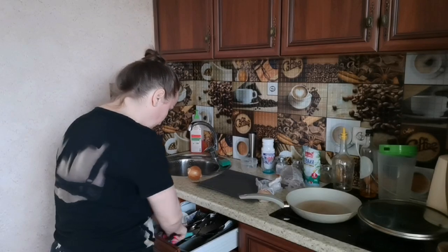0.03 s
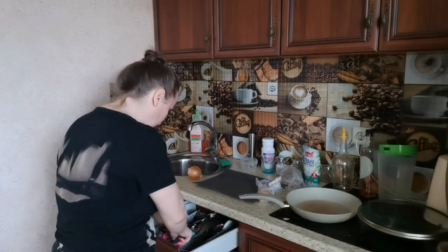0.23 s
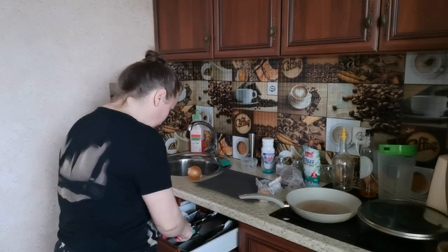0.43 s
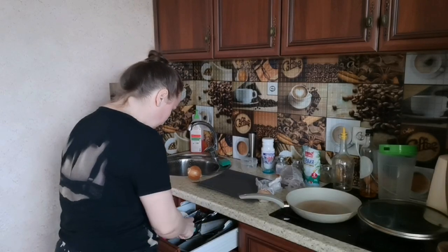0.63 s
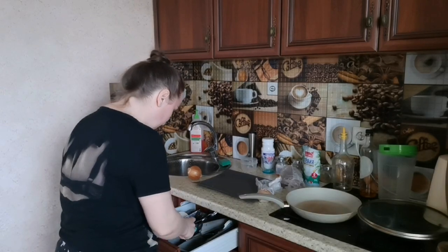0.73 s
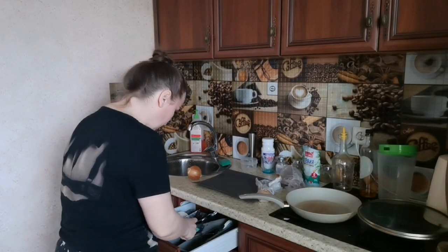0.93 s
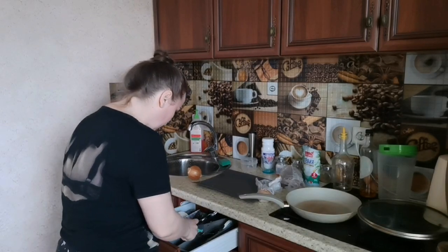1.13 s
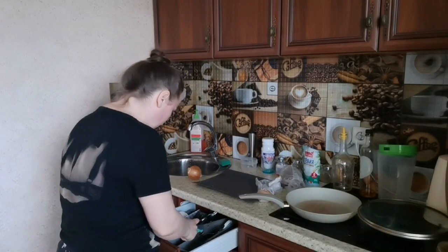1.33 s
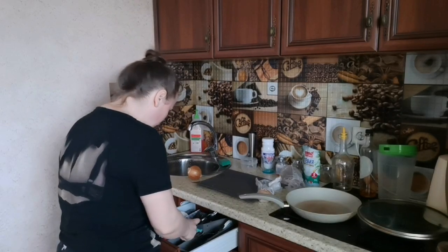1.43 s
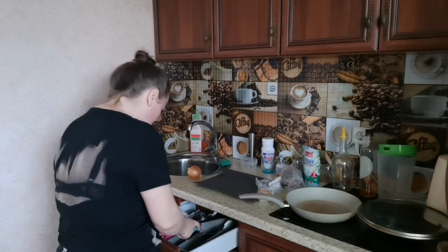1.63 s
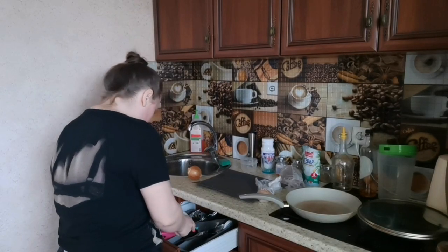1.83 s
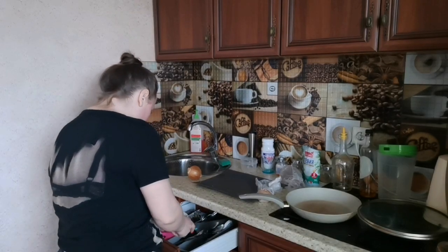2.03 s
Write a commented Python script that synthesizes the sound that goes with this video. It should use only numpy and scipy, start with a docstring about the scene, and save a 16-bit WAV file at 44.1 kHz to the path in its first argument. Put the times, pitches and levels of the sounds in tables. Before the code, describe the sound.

Cutlery and utensils clatter in a drawer as a hand rummages in bursts, with knocks, scraping slides, metal clinks and plastic clacks, heard from a short distance in a small, reflective kitchen over a faint hum.

```python
"""In a small, hard-walled kitchen, a hand rummages through an open drawer in three bouts.
Knocks and slides are bursts of contacts, coloured as utensils, that also set the tray ringing.
Free metal pieces clink and plastic ones clack as sums of dying tones; a dragged handle gives a rising,
hollow note. Short bands of noise make the drawer rumble, over shaped air noise and an appliance's hum."""
import sys
import numpy as np
from scipy import signal
from scipy.fft import rfft, irfft
from scipy.io import wavfile

SR = 44100
rng = np.random.default_rng(int(sys.argv[2]) if len(sys.argv) > 2 else 0)


def file_out(sig):
    """Save sig as 16-bit WAV at sys.argv[1]."""
    # one column per channel
    cols = np.atleast_2d(sig).T
    # limit, then scale
    lim = np.clip(cols, -1, 1)
    pcm = np.round(lim * 32767).astype(np.int16)
    wavfile.write(sys.argv[1], SR, pcm)


N = 92610  # length of the scene [samples]

# modes of the metal pieces that ring free: (frequency [Hz], level [dB], t60 [s])
LADLE = [(777, -16, 0.49), (1240, -5.5, 0.086), (2825, -8.5, 0.39), (2905, -11, 0.2), (6830, -22.5, 0.11)]
TEASPOON = [(7290, 1, 0.14)]
TONGS = [(2250, 2.5, 0.14), (4300, 5, 0.2), (4770, -13, 0.09)]
GRATER = [(2360, 2.5, 0.096), (3870, 2, 0.19), (3980, 1.5, 0.12)]
FORK = [(9895, 0, .66)]
WHISK = [(9600, 0.0058, 0.36)]
PEELER = [(11670, 5, 0.21), (11790, 0, 0.17)]
KNIFE = [(3160, 1.5, 0.23), (3230, -15, 0.11), (3820, -21, 0.18), (10000, -26, 0.22), (11200, -14, 0.34)]
SPOON = [(1150, -13, 0.3), (2190, -2.5, 0.13), (3710, 4.5, 0.085), (4150, -3, .08), (5370, -9, 0.15),
         (7420, -9, 0.18)]
# modes of the hollow plastic pieces: (frequency [Hz], level [dB], t60 [s])
TUB = [(1248, 1.5, 0.038), (1478, 0.5, 0.023), (1602, -1.5, 0.061), (1820, -10, 0.043)]
SPATULA = [(540.4, -2, 0.13), (885, -4, 0.053), (1183, 0, 0.071)]
SCOOP = [(1205, 4, 0.035), (1416, -6.5, 0.035), (1592, -15.5, 0.1)]
LID = [(611.7, -1, 0.3), (690, -0.5, 0.21), (1185, -1.5, 0.091), (1440, 1.5, 0.055)]


def amp(db):
    """Decibels to gain."""
    return 10 ** (np.asarray(db) / 20)


def unit(x):
    """Scales to energy 1."""
    return x / np.sqrt(np.sum(x ** 2, -1, keepdims=True) + 1e-20)


def read(points, hz):
    """Reads a table of (frequency, value) on a log-frequency axis."""
    f, value = np.transpose(points)
    return np.interp(np.log(hz + 1), np.log(f + 1), value)


def add(mix, s, sound):
    """Mixes a sound in at a time in seconds, cut off at the end of the mix."""
    part = mix[:, round(s * SR):][:, :sound.shape[-1]]
    part += sound[..., :part.shape[-1]]


def seconds(length):
    """A time axis."""
    return np.arange(round(length * SR)) / SR


def wander(t, length, count):
    """A random curve through evenly spaced knots."""
    return np.interp(t, np.linspace(0, length, count), rng.standard_normal(count))


def causal(gain_db, size=2048):
    """The sharpest (minimum-phase) impulse response with this spectrum, by folding its cepstrum."""
    cepstrum = irfft(np.log(amp(gain_db)))
    cepstrum[1:size] *= 2
    cepstrum[size + 1:] = 0
    return irfft(np.exp(rfft(cepstrum)))[:size]


def ringing(modes, size=32768):
    """Dying tones that build up over the time of contact; each level is the energy of its mode."""
    contact_s = 0.0006
    t = np.arange(size) / SR
    rise = 1 - np.exp(-(t / contact_s) ** 2)
    sound = 0
    for hz, db, t60 in modes:
        decay = np.exp(-np.log(1000) * t / t60)
        sound = sound + amp(db) * unit(rise * np.cos(2 * np.pi * hz * t) * decay)
    return sound


def paired(z, hz):
    """Blends two unrelated spectra until they are as alike as the two microphones hear the room."""
    # left-right likeness: (frequency [Hz], correlation [0-1])
    likeness = [(60, 0.3), (150, 1), (280, 0.63), (500, 0.74), (900, 0.051), (2200, 0.063), (12000, 0.099)]
    angle = np.arcsin(np.clip(read(likeness, hz), -1, 1)) / 2
    return np.cos(angle) * z + np.sin(angle) * z[::-1]


def kitchen(direct, size=30000, count=8):
    """The path from one spot in the drawer: direct sound, a flurry of near reflections, a dense tail."""
    # reverberation: (frequency [Hz], t60 [s])
    reverb = [(150, 0.52), (400, 0.45), (1000, 0.5), (2800, 0.41), (4600, 0.38), (7300, .34), (13000, 0.22)]
    early_gain, early_s = 0.063, 0.014  # single reflections, within this time
    flurry_gain, flurry_s = 0.091, 0.0022  # extra gain at the start of the tail, and its fade
    hz, t, z = signal.stft(rng.standard_normal((2, size)), SR, nperseg=256)
    decay = np.exp(-np.log(1000) * t[:, None] / read(reverb, hz))
    z = paired(z.swapaxes(1, 2), hz) * decay
    tail = signal.istft(z.swapaxes(1, 2), SR, nperseg=256)[1]
    flurry = flurry_gain * np.exp(-np.arange(tail.shape[1]) / SR / flurry_s)
    path = unit(tail * (1 + flurry))
    path[:, 0] += direct
    for side in path:
        arrivals = (rng.random(count) * early_s * SR).astype(int)
        side[arrivals] += early_gain * rng.choice([-1, 1], count)
    return path


def in_kitchen(sound, direct):
    """Sends a mono sound through a fresh path to the two microphones."""
    return signal.fftconvolve(sound[None], kitchen(direct), axes=1)


def background():
    """Shaped noise for the quiet room, and steady tones wavering in level and phase for an appliance."""
    # colour of the air noise: (frequency [Hz], relative density [dB per Hz])
    air_colour = [(24, -33), (40, -10.5), (239, -10), (313, -15.5), (382, -17), (454, -13), (527, -15.5),
                  (612, -11.5), (824, -18), (4680, -31), (5160, -33), (5560, -37), (15000, -44)]
    # appliance tones: (frequency [Hz], level before wavering [dB])
    hum = [(60, -66.5), (99, -69), (293, -70), (587, -76.5), (636, -69), (5001, -81.5)]
    air_db, hum_waver = -58.5, 0.55
    hz, t = np.fft.rfftfreq(N, 1 / SR), np.arange(N) / SR
    noise = paired(rfft(rng.standard_normal((2, N))), hz)
    air = irfft(noise * amp(read(air_colour, hz)), N)
    out = amp(air_db) * np.sqrt(N) * unit(air)
    for tone_hz, db in hum:
        swell = hum_waver * wander(t, t[-1], 20)
        drift = hum_waver * wander(t, t[-1], 20)
        tone = np.sin(2 * np.pi * tone_hz * t + 2 * drift)
        out = out + amp(db) * np.sqrt(2) * (1 + swell) * tone
    return out


def drawer():
    """Short low rumbles, each a narrow band of noise, as the drawer shifts and its panels boom."""
    # rumbles: (time [s], length [s], centre frequency [Hz], level [dB])
    rumbles = [(0.172, 0.09, 112, -55.5), (0.252, 0.17, 301, -44), (.28, 0.16, 214, -47.5),
               (0.405, 0.092, 221.5, -53), (0.414, 0.1, 108, -56.5), (1.195, 0.081, 370, -42.5),
               (1.369, 0.11, 114, -55), (1.636, 0.22, 112, -60)]
    width_hz = 10  # from the centre to a gain of 1/e
    out, hz = np.zeros((2, N)), np.fft.rfftfreq(SR, 1 / SR)
    for s, length, centre_hz, db in rumbles:
        t = seconds(length)
        band = np.exp(-((hz - centre_hz) / width_hz) ** 2)
        noise = irfft(rfft(rng.standard_normal(SR)) * band)
        swell = np.sin(np.pi * t / length)
        add(out, s, amp(db) * np.sqrt(len(t)) * unit(noise[:len(t)] * swell))
    return out


def drag():
    """A plastic handle sticks and slips along the tray; its hollow note rises as it goes."""
    # the drag: (length [s], from frequency [Hz], to frequency [Hz], level [dB])
    course = (0.1571, 501.5, 673.5, -35.5)
    start_s, direct = 0.172, 1  # begins after the first knock
    slips_per_s, slip_jitter, slip_depth = 91, 0.22, 0.49  # jitter in slips, depth 0-1
    roughness = 0.64  # phase wander [rad]
    length, from_hz, to_hz, db = course
    t = seconds(length)
    slips = slips_per_s * t + slip_jitter * wander(t, length, 9)
    grip = 1 - slip_depth * np.cos(np.pi * slips) ** 2
    rough_phase = roughness * wander(t, length, 16)
    glide_hz = np.linspace(from_hz, to_hz, len(t))
    note = np.sin(2 * np.pi * np.cumsum(glide_hz) / SR + rough_phase)
    sound = note * grip * np.sqrt(np.sin(np.pi * t / length))
    out = np.zeros((2, N))
    add(out, start_s, amp(db) * np.sqrt(len(t)) * unit(in_kitchen(sound, direct)))
    return out


def struck(events, direct):
    """Pieces that lie free speak at once when struck, and ring on, mode by mode."""
    out = np.zeros((2, N))
    for s, db, piece in events:
        path = kitchen(direct)
        for mode in piece:
            heard = signal.fftconvolve(ringing([mode])[None], path, axes=1)
            add(out, s, amp(db + mode[1]) * unit(heard))
    return out


def plastic_clacks():
    """Hollow clacks: the low modes of plastic, most of them dying fast."""
    # clacks: (time [s], gain on the modes [dB], piece)
    clacks = [(.166, 3, SPATULA), (.268, 2, SCOOP), (1.156, -3.5, LID), (1.177, -4, LID),
              (1.3745, 0.5, TUB), (1.717, -8.5, SCOOP)]
    return struck(clacks, direct=0.82)


def metal_clinks():
    """Clear clinks: the mostly higher modes of metal, many ringing longer."""
    # clinks: (time [s], gain on the modes [dB], piece)
    clinks = [(.264, -7.5, GRATER), (.269, -10.5, TEASPOON), (.408, -15, WHISK), (0.542, -18.5, PEELER),
              (1.091, -5, LADLE), (1.120, -25, PEELER), (1.274, -10.5, TONGS), (1.398, -15, FORK),
              (1.668, -8.5, KNIFE), (2.054, -22, SPOON)]
    return struck(clinks, direct=1.07)


def utensil(contacts, levels_db, count=64):
    """Contacts excite one utensil with its own short random modes, and sound through the kitchen."""
    # centres of thud, clack, clatter and tick: (frequency [Hz], ...)
    band_hz = [500, 1200, 3400, 8500]
    # colour of a contact: (frequency [Hz], gain [dB])
    contact_colour = [(50, -38.5), (150, -21), (240, -8), (330, -5), (500, -0.5), (750, 0.5), (1250, -4),
                      (1900, -7), (2800, -9.5), (4600, -7.5), (5800, -13.5), (9000, -14.5), (12200, -14.5),
                      (13300, -21.5), (15800, -36)]
    low_hz, top_hz, middle_t60_s, body_db = 1893, 13134, 0.021, -11.5
    where, strength, damping = rng.random((3, count))
    hz = low_hz + (top_hz - low_hz) * where
    modes = zip(hz, -10 * strength, middle_t60_s * (0.5 + damping))
    body = amp(body_db) * unit(ringing(modes, size=4096))
    body[0] += 1  # the bare contact
    f = np.fft.rfftfreq(4096, 1 / SR)
    balance_db = read(list(zip(band_hz, levels_db)), f)
    colour = causal(read(contact_colour, f) + balance_db)
    sound = signal.fftconvolve(signal.fftconvolve(contacts, colour), unit(body))
    return in_kitchen(sound, direct=0.18)


def knock(size=2048):
    """One blow and its quickly dying chatter of random bounces."""
    knock_db = 45.5
    bounces_per_s, bounce_fade_s, bounce_size = 450, 0.0077, 0.91  # size against the blow
    t = np.arange(size) / SR
    sizes = bounce_size * rng.standard_normal(size)
    contacts = sizes * (rng.random(size) < bounces_per_s / SR) * np.exp(-t / bounce_fade_s)
    contacts[0] = 1
    return amp(knock_db) * unit(contacts)


def slide(start, fastest, end, size=16384):
    """A run of small uneven contacts that swells and dies with the push of the hand."""
    slide_db, contacts_per_s, spread_db, push_curve = 15, 270, 5, 0.93
    sizes_db = spread_db * np.clip(rng.standard_normal(size), -2, 2)
    sizes = amp(sizes_db) * rng.choice([-1, 1], size)
    contacts = unit(sizes * (rng.random(size) < contacts_per_s / SR)) * np.sqrt(size)
    push = np.interp(start + np.arange(size) / SR, [start, fastest, end], [0, 1, 0])
    return amp(slide_db) * contacts * push ** push_curve


def rummage(count=3):
    """Knocks, and slides from piece to piece; the firmer the pile rests on the tray, the more it rings."""
    # utensils knocking: (time [s], thud, clack, clatter and tick, each a relative level [dB])
    knocks = [(0.1652, -34.5, -27.5, -33, -36.5), (0.219, -32.5, -30, -51, -40.5),
              (.232, -32.5, -25, -36.5, -41), (.267, -32, -27.5, -30, -40),
              (.280, -32.5, -26.5, -33.5, -50), (.385, -69, -33.5, -33, -43), (.401, -53, -29.5, -58, -31),
              (0.53, -42, -34.5, -36, -42), (.541, -41.5, -32, -31.5, -34.5), (.983, -66, -57, -61, -58.5),
              (1.086, -52, -39.5, -37.5, -60), (1.135, -52, -52, -39, -75),
              (1.1519, -41, -29.5, -30, -35.5), (1.160, -35.5, -35, -28, -52),
              (1.178, -31.5, -31.5, -40, -35), (1.272, -50, -39, -29.5, -33.5),
              (1.359, -49, -31, -32.5, -46), (1.3779, -35.5, -37, -29, -36), (1.396, -36, -56, -44, -46),
              (1.434, -44.5, -38, -39.5, -56), (1.576, -62, -36.5, -46, -72), (1.618, -61, -36, -51, -44.5),
              (1.638, -61, -36, -37, -36), (1.665, -47.5, -27.5, -35.5, -31.5),
              (1.742, -40, -35.5, -34, -47), (1.794, -37, -44.5, -50, -67), (1.967, -59, -54, -62, -60),
              (1.999, -56.5, -47, -76, -70), (2.054, -57, -43, -48, -50.5)]
    # utensils sliding over each other:
    # (start [s], fastest [s], end [s], thud, clack, clatter and tick, each a relative level [dB])
    slides = [(0.172, 0.22, 0.38, -39.5, -39, -31, -41.5), (0.334, 0.412, 0.59, -42, -37.5, -41.5, -36.5),
              (0.519, 0.575, 0.63, -34.5, -33.5, -31, -37), (0.944, 0.972, 1.004, -58, -53.5, -50.5, -56.5),
              (1.079, 1.147, 1.47, -48, -35.5, -38.5, -38), (1.218, 1.25, 1.462, -40, -38, -34.5, -32),
              (1.327, 1.375, 1.49, -44.5, -40, -45, -50), (1.395, 1.414, 1.62, -49, -46, -61, -86),
              (1.59, 1.671, 1.845, -42, -36, -30.5, -34.5), (1.682, 1.697, 1.86, -38, -36.5, -42, -34.5)]
    # modes of the tray and drawer: (frequency [Hz], level [dB], t60 [s])
    tray = [(220.7, -24, 0.62), (300, -33.5, 0.33), (427.8, -20.5, 0.18), (528.7, -23.5, 0.13),
            (615.6, -23.5, 0.13), (693, -42, 0.74), (820, -47.5, 0.8), (922.6, -25.5, 0.14),
            (1170, -42, 0.067), (1254, -36, 0.031), (1568.5, -23.5, 0.2)]
    # how firmly the pile rests on the tray: (time [s], firmness [0-1])
    seating = [(0, 0.5), (1.52, 0.81), (1.65, 0.83), (2.1, 0.44)]
    shift_s = 0.035  # a sliding utensil meets another neighbour this often
    out = np.zeros((2, N))
    for s, *levels_db in knocks:
        add(out, s, utensil(knock(), levels_db))
    for start, fastest, end, *levels_db in slides:
        contacts = slide(start, fastest, end)
        neighbour = np.arange(len(contacts)) / SR // shift_s % count
        for k in range(count):
            add(out, start, utensil(contacts * (neighbour == k), levels_db))
    seated = np.clip(np.interp(np.arange(N) / SR, *np.transpose(seating)), 0, 1)
    tray_ring = signal.fftconvolve(out * seated, ringing(tray)[None], axes=1)[:, :N]
    return out + tray_ring


def scene():
    """The drawer and its contents over the quiet kitchen."""
    contents = rummage() + metal_clinks() + plastic_clacks() + drag()
    return contents + drawer() + background()


def record(dry):
    """The slight imbalance of the microphones, then the band limit."""
    # microphone balance: (frequency [Hz], left minus right [dB])
    lean = [(250, -1), (500, 1), (1200, 0.3), (4500, 1), (9000, -1), (14000, -1.5)]
    edge_hz = 15750
    half_db = read(lean, np.fft.rfftfreq(N, 1 / SR)) / 2
    heard = irfft(rfft(dry) * amp([half_db, -half_db]), N)
    low_pass = signal.firwin(511, edge_hz, window=("kaiser", 9), fs=SR)
    return signal.oaconvolve(heard, low_pass[None], "same")


dry = scene()
out = record(dry)
file_out(out)
```